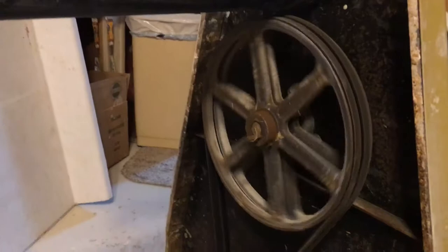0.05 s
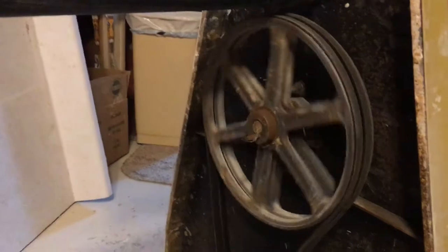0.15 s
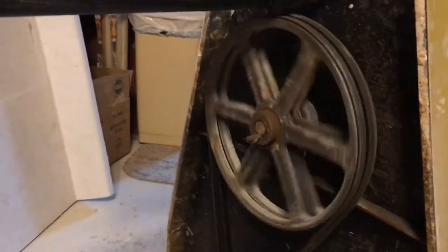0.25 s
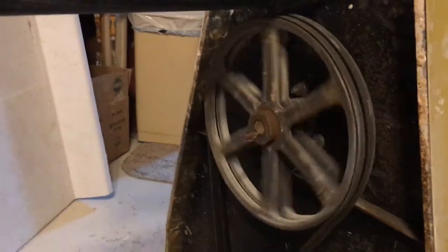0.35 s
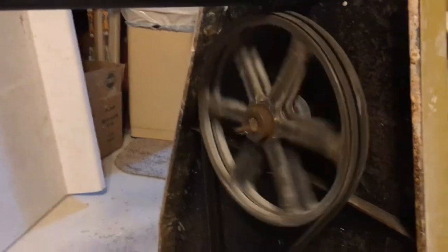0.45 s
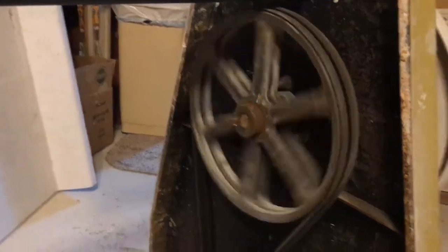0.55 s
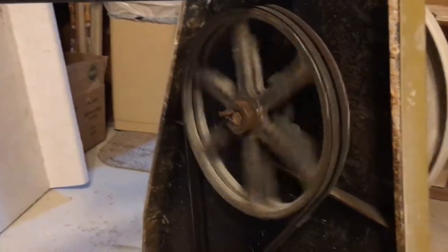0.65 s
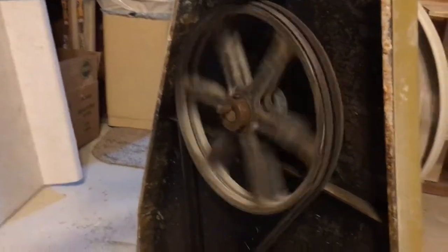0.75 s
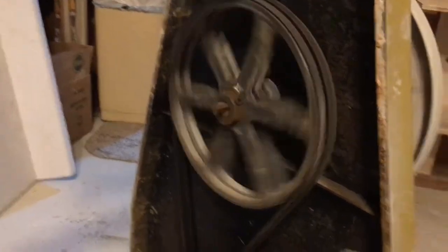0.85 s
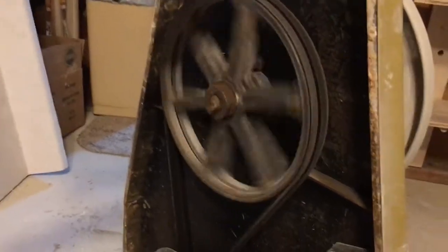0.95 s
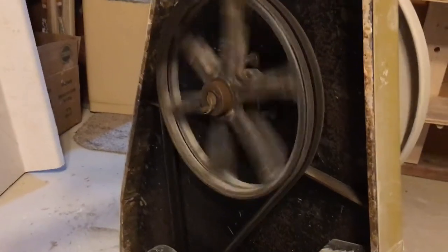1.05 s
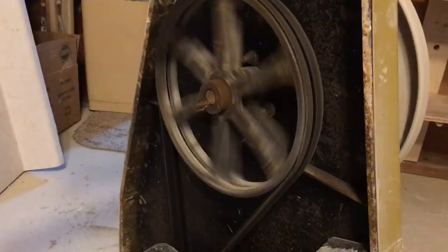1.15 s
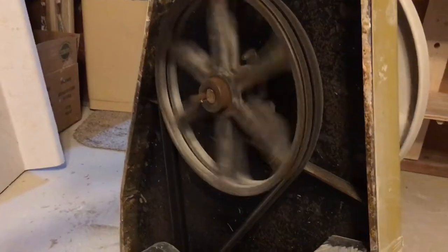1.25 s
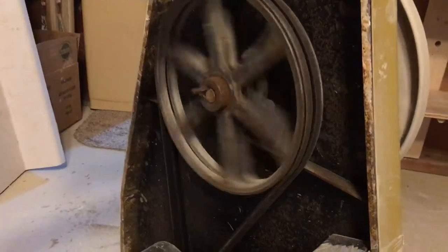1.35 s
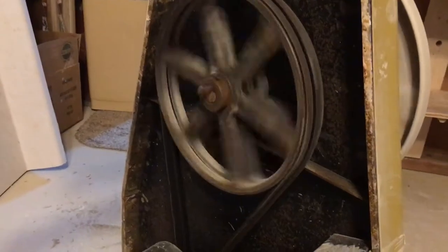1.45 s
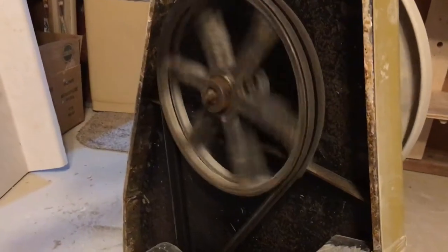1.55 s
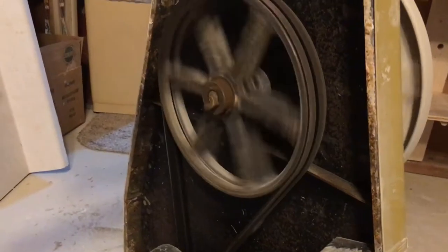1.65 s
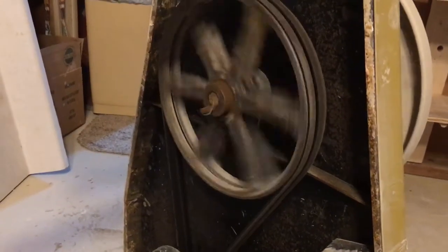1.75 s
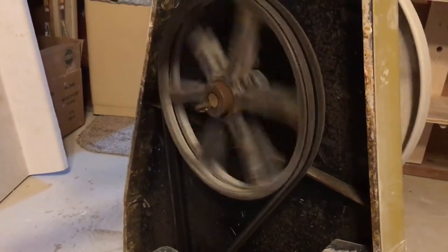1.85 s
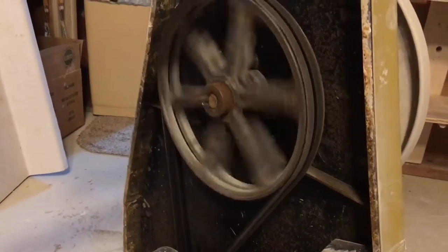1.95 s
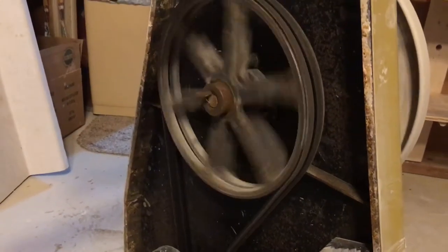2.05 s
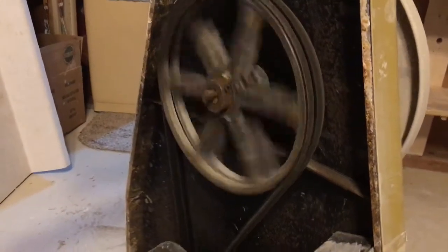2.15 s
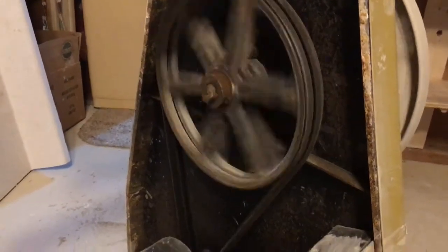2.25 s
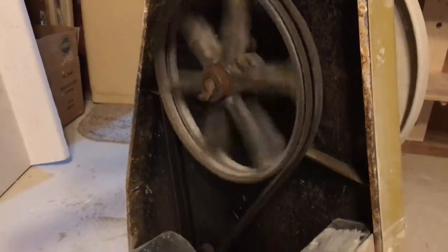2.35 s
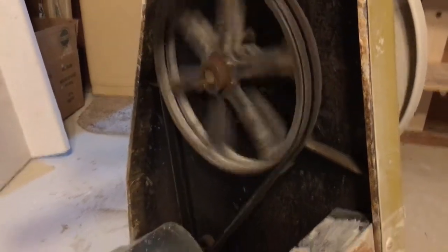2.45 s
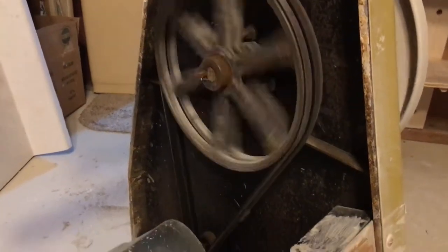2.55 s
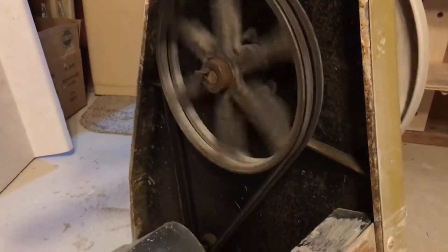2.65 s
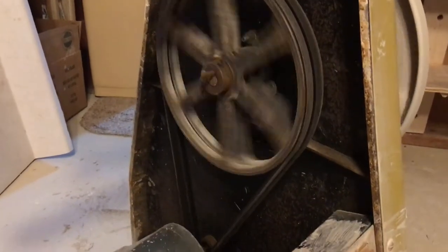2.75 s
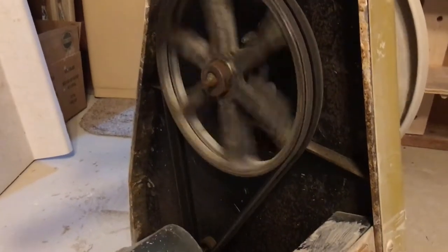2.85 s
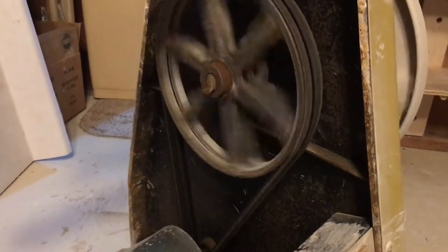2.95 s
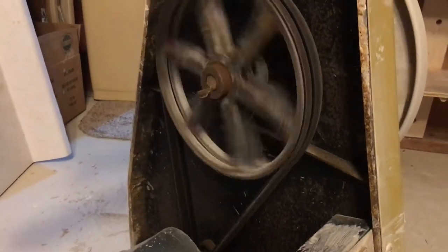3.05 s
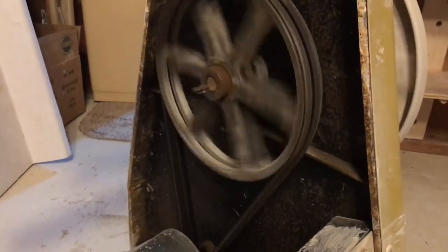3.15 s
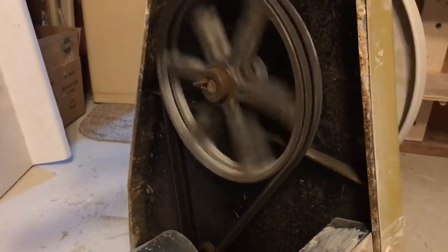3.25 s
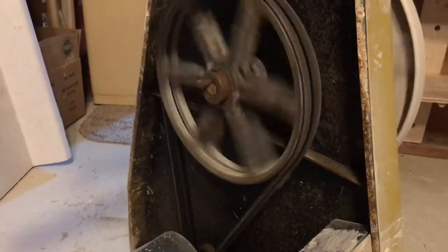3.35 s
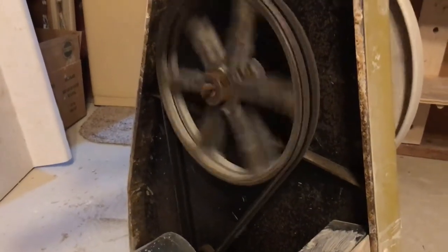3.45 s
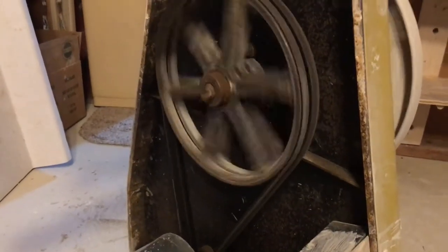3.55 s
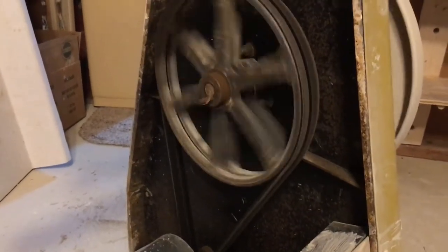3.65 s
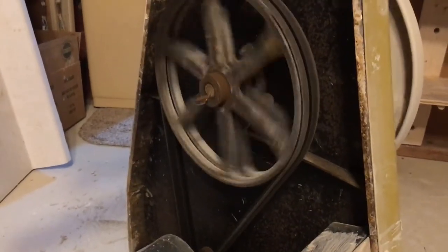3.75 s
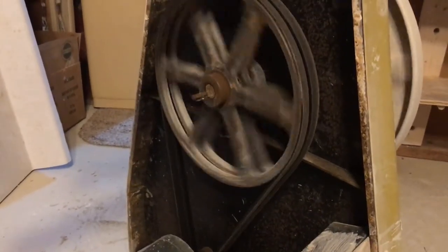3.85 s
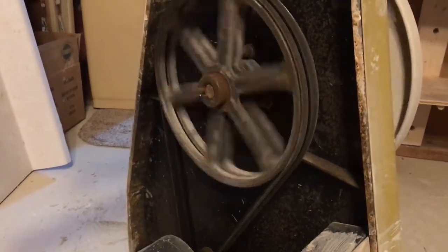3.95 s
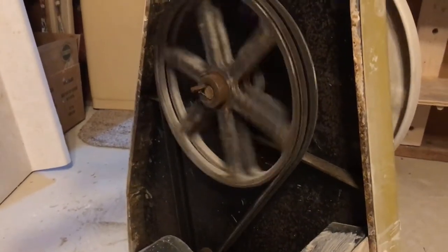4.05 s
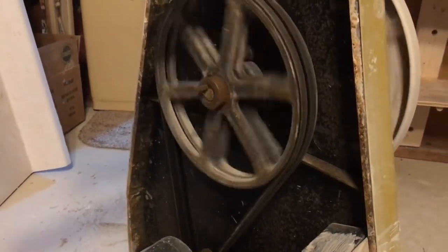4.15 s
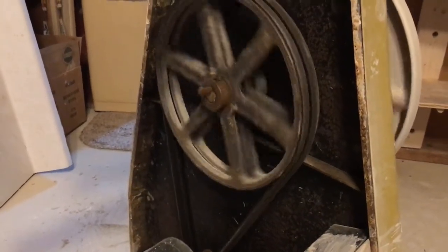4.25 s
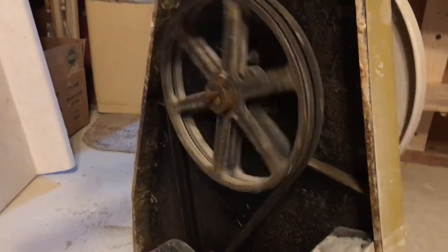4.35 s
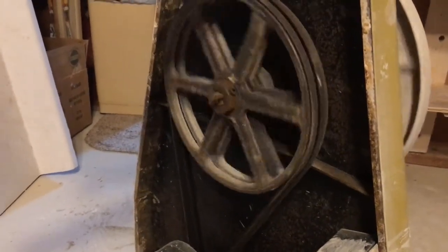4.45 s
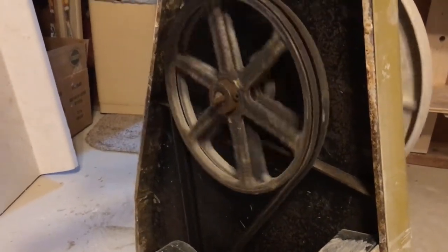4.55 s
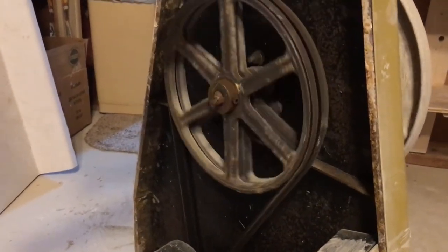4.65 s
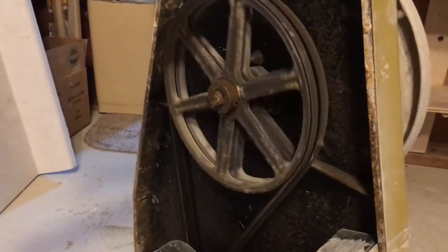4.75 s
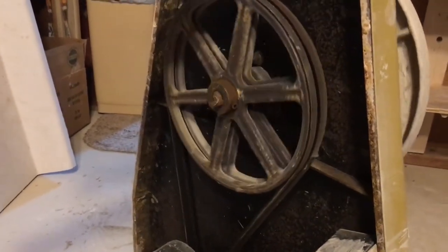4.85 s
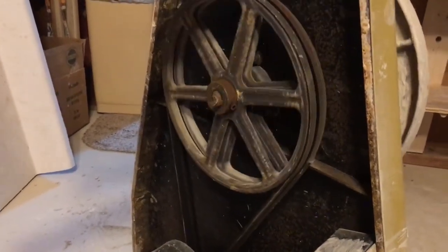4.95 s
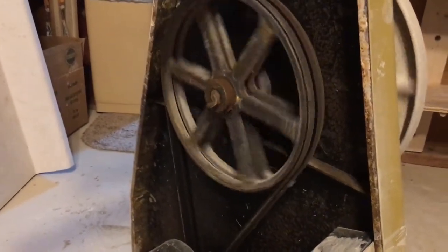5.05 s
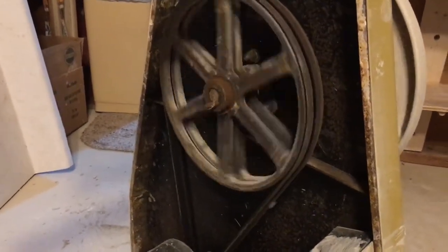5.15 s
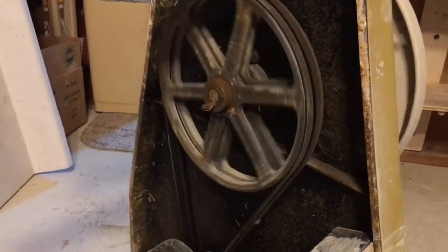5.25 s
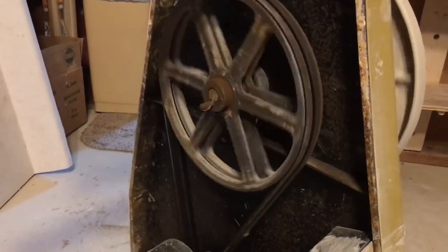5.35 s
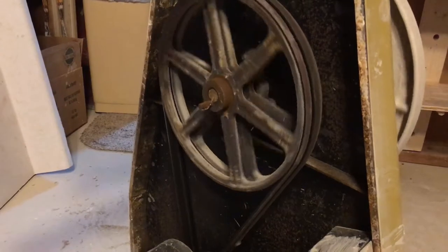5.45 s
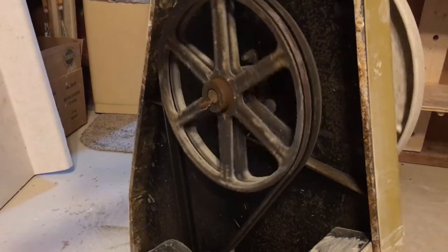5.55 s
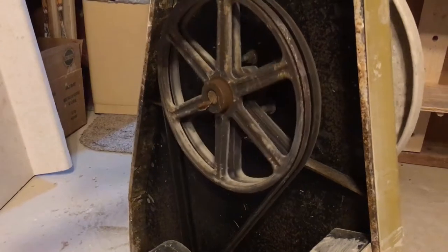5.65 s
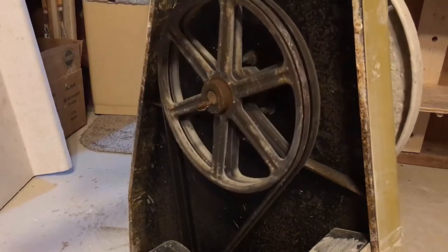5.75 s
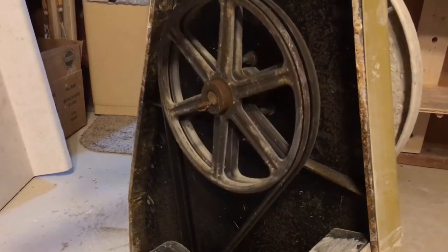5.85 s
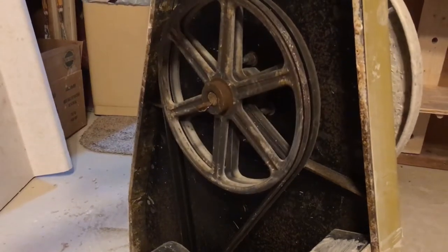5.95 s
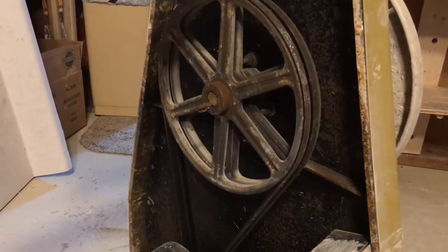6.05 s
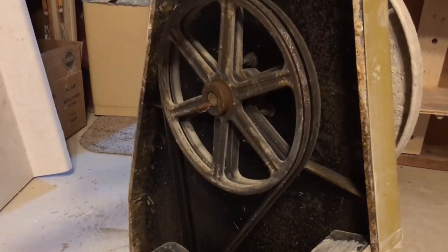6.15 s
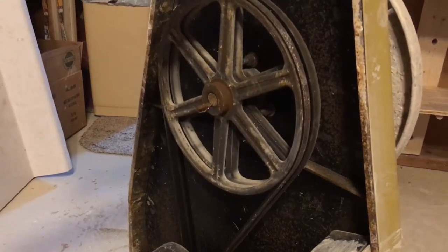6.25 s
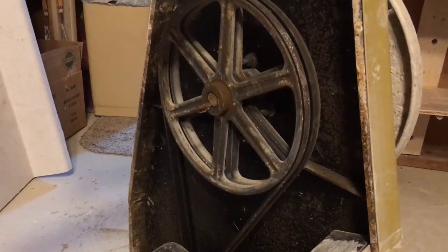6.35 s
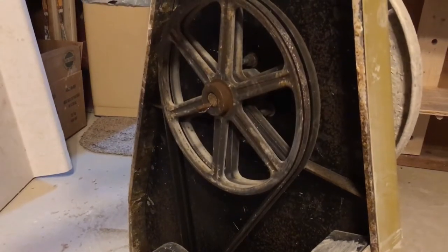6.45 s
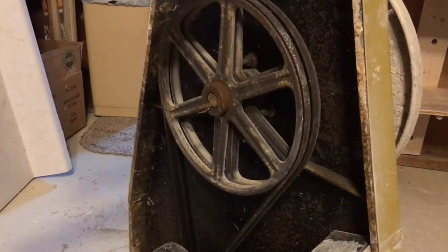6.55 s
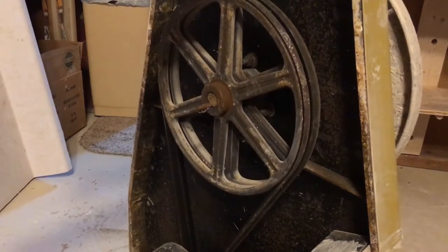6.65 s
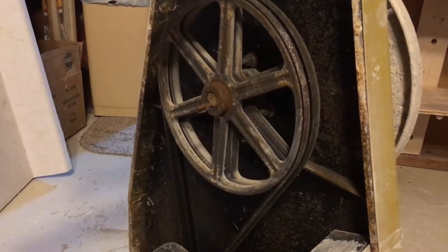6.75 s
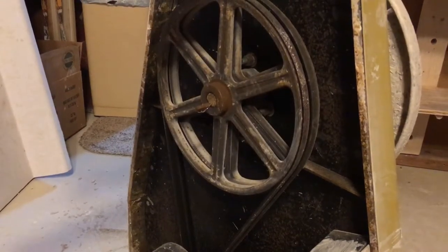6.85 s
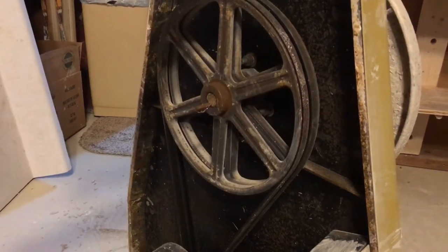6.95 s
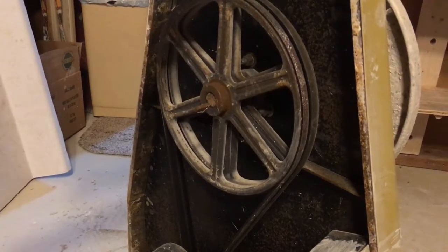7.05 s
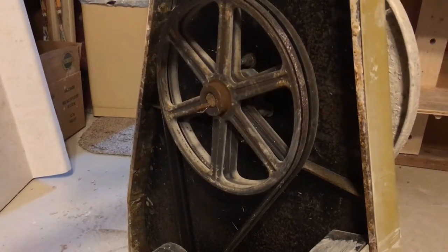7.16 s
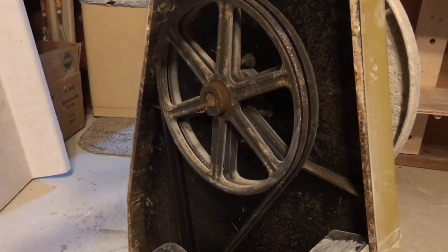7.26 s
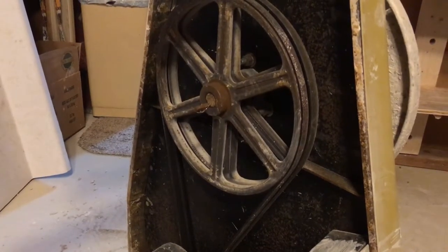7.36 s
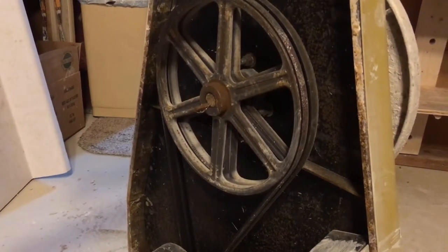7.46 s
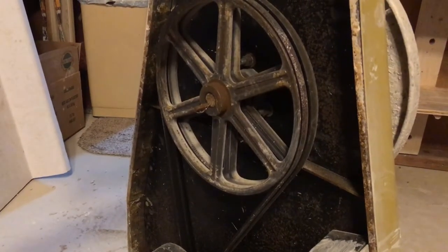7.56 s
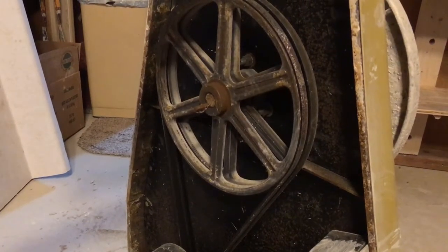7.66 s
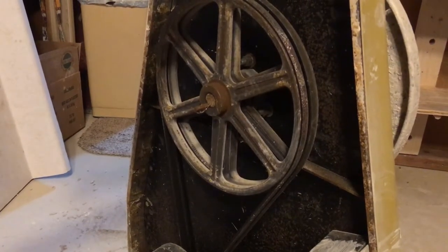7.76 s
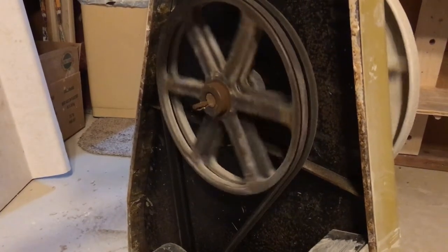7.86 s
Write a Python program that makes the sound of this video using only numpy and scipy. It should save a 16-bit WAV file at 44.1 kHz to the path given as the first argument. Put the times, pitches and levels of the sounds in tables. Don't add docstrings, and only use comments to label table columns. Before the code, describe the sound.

Close buzzing motor hum with whirring belt squeaks stops abruptly, the wheel whirs down, a metallic pedal clang rings, then quiet nudges and another bang.

```python
import sys
import numpy as np
from scipy import signal
from scipy.fft import rfft, irfft, next_fast_len
from scipy.io import wavfile

SR = 44100
rng = np.random.default_rng(int(sys.argv[2]) if len(sys.argv) > 2 else 0)


def store_wav(level_fs):
    pcm = np.round(np.clip(np.atleast_2d(level_fs), -1, 1) * 32767)
    wavfile.write(sys.argv[1], SR, pcm.T.astype(np.int16))


def boost(x):
    u = np.asarray(x, float) / 20
    return 10 ** u


N = 347949

# frequency in Hz, level in dB per Hz.
ROOM_SPECTRUM = [(30, -8), (50, -0.5), (75, 0), (100, -2), (140, -4), (180, -7), (260, -11.5), (300, -17.5),
                 (370, -15.5), (500, -25), (650, -29.5), (900, -39)]
ROOM_DB = -48
# frequency in Hz, level in dB.
APPLIANCES = [(41.1, -51.5), (120, -50.5), (138, -61), (222, -66), (258, -63)]
# frequency in Hz, level in dB per Hz.
AIR_SPECTRUM = [(410, -28), (700, -5), (757, -1), (1990, -9), (2860, -16.5), (3140, -15), (4890, -20.5),
                (12000, -23.5), (15800, -28)]
AIR_DB = -69
# centre in Hz, width in Hz, lift in dB.
PORT_DIP = (10500, 500, -7)

# start in seconds, peak in dB, brightness in dB.
NUDGES = [
    (5.75, -37, -9),
    (6.428, -52, -2),
    (6.758, -52, 0),
    (7.086, -44.5, -1),
    (7.254, -35.5, -3.5),
    (7.309, -51.5, 2),
    (7.555, -48, -0.5),
    (7.704, -38.5, -2),
]
# frequency in Hz, level in dB, T60 in seconds.
NUDGE_MODES = [(362.6, 2.5, 0.14), (410, -13, 0.17), (453, -17, 0.15), (587, -7.5, 0.16), (700, -17, 0.092),
               (870, -12, 0.054), (1770, -29, .05), (2600, -19, .008), (4500, -19.5, .006)]
# start in seconds, peak in dB, centre in Hz.
SCUFFS = [
    (7.084, -63, 2015),
    (7.252, -55, 2400),
    (7.702, -57.5, 2010),
]
SCUFF_S = 0.0055

# start in seconds, panel level in dB, low body level in dB, bright level in dB.
PEDAL_CONTACTS = [(5.052, -47, -43, -58), (5.0626, -12.5, -16.5, -17.5), (5.0664, -14.5, -15, -41),
                  (5.072, -9.5, -21, -40), (5.0793, -16, -15.5, -24), (5.0933, -20.5, -23.5, -31),
                  (5.1108, -33, -32, -41), (7.8342, -55, -34, -55), (7.8456, -30, -26, -32.5),
                  (7.855, -17.5, -14, -43), (7.8628, -29, -21, -36.5), (7.869, -35, -24, -43),
                  (7.879, -22, -32, -43)]
# band centre in Hz, level in dB, T60 in seconds.
CRASH_BANDS = [(130, -24, 0.48), (394, -18.5, 0.36), (900, -22.5, 0.076), (1700, -13, 0.18),
               (3300, -26, 0.22), (4870, -17, 0.21), (7990, -22, 0.2017), (6300, -11.5, 0.037),
               (12000, -15.5, .035), (12000, -38, .17)]
# level in dB, T60 in seconds.
BODY_HZ = [75, 114, 205, 242, 343, 402, 462, 430, 624, 786, 825, 870, 964]
BODY_RING = [(-21.5, 0.37), (-13, 0.33), (-20.5, 0.35), (-31, 0.44), (-12.5, 0.3), (-9, .3), (-13, 0.22),
             (-24, 0.17), (-29.5, 0.32), (-25, .2), (-15, .19), (-24, 0.22), (-29.5, 0.28)]
PANEL_HZ = [1200, 1310, 1514, 1545, 1580, 1754, 1927, 2060, 2119, 2223, 2703, 3009]
PANEL_RING = [(-19, .35), (-21, .1), (-2.5, .2), (-3, 0.2486), (3, 0.092), (-9, 0.25), (-24, .2),
              (-14.5, .12), (-13.5, .25), (-23, .2), (-13, .2), (-17.5, 0.21)]
BRIGHT_HZ = [1720, 3560, 3623, 3740, 3960, 4102, 4610, 4872, 5270, 5556, 5852, 6280, 8100]
BRIGHT_RING = [(6, .04), (-2.5, 0.14), (-6, 0.22), (-0.5, .05), (-2, .04), (-17, .18), (-16.5, 0.26),
               (-18, .16), (2.5, 0.016), (-5.5, .05), (-19.5, 0.17), (-15, .06), (-6.5, 0.061)]
BODY_RISE_S, PANEL_RISE_S, BRIGHT_RISE_S = 0.003, 0.0015, 0.0004
DAMP_S, DAMP_DB = 5.215, -3
CHATTER_DB, CHATTER_PER_S = 3.5, 40
# start in seconds, peak in dB, centre in Hz.
SCRAPES = [
    (5.04, -58, 1920),
    (5.048, -46, 5000),
    (5.052, -50, 8980),
    (7.833, -39, 5200),
    (7.834, -48, 10000),
    (7.842, -46, 9500),
    (7.846, -46, 6000),
    (7.85, -46, 10000),
]
SCRAPE_S = 0.007
# start in seconds, peak in dB, centre in Hz.
PIVOT_SQUEAKS = [
    (7.834, -38, 10150),
    (7.848, -42, 12900),
    (7.8525, -31, 11850),
    (7.8585, -37, 12000),
]

# start in seconds, peak in dB.
DRIVE_KNOCKS = [
    (0.585, -45),
    (0.625, -49),
    (0.661, -55),
    (2.0258, -40),
    (3.3191, -36),
]
# frequency in Hz, level in dB, T60 in seconds.
KNOCK_MODES = [(366, 12, .08), (1734, -3, 0.3), (2050, -5, 0.094), (2090, -9, 0.14)]
# start in seconds, peak in dB.
SLAPS = [(.294, -45), (.422, -41), (.559, -40), (.7, -40), (.981, -46), (1.379, -47), (1.481, -49),
         (1.554, -46), (1.798, -51), (2.825, -44.5), (2.995, -54), (3.69, -40), (3.73, -35.5), (3.96, -39),
         (4.003, -39), (4.03, -40), (4.082, -36), (4.11, -45), (4.141, -55), (4.19, -42), (4.235, -46),
         (4.379, -40.5), (4.41, -42.5), (4.644, -54)]
# frequency in Hz, level in dB, T60 in seconds.
SLAP_MODES = [(588, -9, 0.22), (621, -1, 0.23), (636, -7, 0.18)]
# start in seconds, peak in dB,
# centre in Hz.
LATE_CREAKS = [(1.6334, -38, 7560), (1.7047, -43, 6220), (4.9187, -60, 11300), (4.929, -57, 12000),
               (4.937, -57, 12500), (4.943, -58, 12000), (4.957, -57, 12000), (4.974, -57, 12000),
               (4.9482, -53, 11200), (4.9816, -55, 12000), (5.0055, -55, 12300), (5.037, -64, 12200),
               (5.2752, -58, 11500), (5.3994, -53, 8200), (5.4468, -55, 11600), (5.7443, -56.5, 9290)]
# start in seconds, peak in dB, centre in Hz.
SNAPS = [
    (5.7109, -54, 10070),
    (5.7967, -50.5, 12470),
    (5.8144, -53, 12600),
    (5.8184, -56, 11500),
    (5.8426, -44.5, 12000),
    (5.899, -60, 8270),
    (7.0834, -68, 7280),
    (7.2494, -46, 11240),
    (7.6994, -65, 9970),
]
CREAK_S, SNAP_S = 0.0024, 0.0012
# start in seconds, peak in dB, centre in Hz.
SWISHES = [(4.0, -47, 12500), (4.35, -53, 12500), (4.53, -52, 12400), (4.66, -57, 12800),
           (4.725, -58, 12300), (4.795, -57, 12300), (4.865, -60, 12300), (4.89, -60, 12300),
           (4.93, -63, 12900), (5.35, -50, 12300), (5.385, -51, 12300), (5.44, -54, 12160),
           (5.5, -57, 12600), (5.52, -58, 6550), (5.565, -61, 12500), (5.62, -63, 6550)]
SWISH_S = 0.013
# start in seconds, peak in dB, centre in Hz.
GUARD_RUBS = [(4.3, -59, 6500), (4.4, -61, 6500), (4.47, -59, 5940), (4.5, -55, 6550), (4.66, -60, 6500),
              (4.73, -63, 6500), (4.82, -61, 6550), (5.22, -62, 6500), (5.3, -59, 6300), (5.38, -58, 6550),
              (5.56, -60, 6480), (4.33, -56, 9500), (4.5, -57, 9400), (4.66, -58, 9500), (4.74, -60, 9500),
              (5.3, -58, 9600), (5.4, -58, 9600), (5.57, -57.5, 9700), (5.1, -59, 9700), (5.12, -60, 11600),
              (5.3, -60, 3200), (5.38, -60, 2500)]
# start in seconds, peak in dB, centre in Hz.
PANEL_SWELLS = [(.4, -51, 1540), (.72, -44, 1560), (.79, -41, 1540), (.84, -41, 1560), (.55, -41, 830),
                (.68, -37, 780), (0.68, -36, 785), (.97, -43, 850), (.82, -36, 615), (.88, -37, 570),
                (3.7, -41, 780), (3.8, -41, 770), (3.3, -44, 800), (3.3, -45, 760), (3.65, -43, 1390),
                (3.82, -47, 1230), (3.55, -41, 610), (3.62, -43, 600), (4.55, -57, 2300), (4.65, -59, 2250),
                (4.75, -59, 2300), (4.85, -60, 2250), (3.98, -46, 450)]
RUB_S = 0.04
# place in laps, peak in dB, centre in Hz.
WORN_SPOTS = [(.1, -34.5, 11300), (.19, -50, 12000), (.256, -34, 13000), (.295, -37, 12500),
              (.335, -35, 12500), (0.366, -38, 12000), (.392, -29.5, 12100), (0.416, -27.5, 12200),
              (.458, -50, 12500), (.508, -35, 11500), (.545, -33, 11600), (.59, -34, 12400),
              (.63, -48, 11500), (.68, -60.5, 11600), (.76, -57, 11600), (.795, -48, 11900),
              (.875, -44, 12000), (.965, -71, 11600)]
# creep in laps, grip in dB.
LAPS = [
    (0, -9),
    (-.012, -6),
    (-.008, -3),
    (-.008, -2),
    (-.008, -2),
    (0.001, -22.5),
]
SPOT_SPREAD_DB, SPOT_WANDER = 2.5, 0.0022
TURNS_PER_LAP, LAP_START = 25.68, -0.063
STIFF_AT, STIFF_WIDTH, STIFF_DB = 0.42, 0.31, 5.5
FLECK_DB, FLECK_SPREAD_DB, FLECK_S = -53, 6.5, 0.0033
FLECK_GLIDE, FLECK_ROUGH = 0.1, 0.5

# time in seconds, speed in turns per second.
ROTOR_SPEED = [(0, 9), (.4, 16.5), (.75, 23.95), (1.0, 26.6), (1.3, 27.9), (1.6, 28.12), (1.85, 28.35),
               (2.2, 28.5), (3.555, 28.5), (3.65, 26.3), (3.8, 23.6), (4.0, 19.9), (4.43, 11.9),
               (5.05, 1.5), (5.35, 6), (5.9, .5), (8, .5)]
TOP_SPEED = 28.5
SHOVE_S, SHOVE_HOLD_S = 5.1, 0.26
# full-speed level in dB, steepness, level after the jolt in dB, its fade in dB per s.
BELT_LAW = (-55.5, 0.99, -69, 28)
WHINE_LAW = (-56, 3, -95, 30)
RUMBLE_LAW = (-50, 1.5, -55.5, 46)
BOUNCE_LAW = (-54, 3.5, -67, 25)
BRUSH_LAW = (-60, 1.0, -75, 30)
DRUM_LAW = (-55.5, 2, -61, 59)
# turns per s, width, lift in dB.
CRITICAL = (15.5, 12, 15)
JUDDER = (22.5, 7, 6)
WHINE_LOCK = (28.5, 1.4, 7.5)
LOAD_DB, SHAKE_BELOW_DB = -44.5, -4.5
# frequency in Hz, level in dB per Hz.
RUMBLE_SPECTRUM = [(150, -12), (250, 0), (400, -6.5), (510, -14.5), (560, -3.5), (650, -2.5), (800, -4.5),
                   (950, -13.5), (1050, -28)]
SHIELD_SPECTRUM = [(560, -39.5), (950, -8.5), (1010, -10), (1200, -4.5), (1410, -5.5), (1530, 0.5),
                   (1850, -17), (2500, -15.5), (3250, -43.5), (5500, -120)]
BRUSH_SPECTRUM = [(1240, -44), (2100, -6), (2270, -15.5), (2510, -12.5), (2980, -2), (3530, -3),
                  (4120, -17), (4800, -20), (6240, -44.5), (10600, -120)]
BELT_SPECTRUM = [(2530, -26.5), (4300, -5.5), (5130, -2.5), (6530, -2.5), (7170, -6), (9540, -2),
                 (10500, -5.5), (11800, -4), (15300, -11), (16000, -18.5)]
# centre in Hz, width in Hz, lift in dB.
HOUSING = [(368, 54, 7.5), (452, 45, 11), (575, 17, 9.5), (617, 14, 12), (685.6, 14, 4), (775, 23, 7.5),
           (1208.5, 55, 10.5), (1362, 38, 7.5), (2292, 77, 6.5), (2700, 240, 2), (2936, 60, 9),
           (3056, 80, 6), (3300, 130, 5.5), (3510, 200, 7.5), (3900, 110, 8), (4310, 82, 7.5),
           (6550, 220, 3.5), (9620, 480, 4.5), (10520, 330, -8), (11600, 170, 6), (14760, 120, 8)]
# centre in Hz, width in Hz, lift in dB.
DRUM_PANEL = (617, 220, 11)
WHINE_HZ, WHINE_WIDTH_HZ = 1545, 60
SLOT_DB, COMMUTATOR_DB, PULLING_DB = -61.5, -62, -1.5
# centre in Hz, width in Hz, lift in dB.
TONE_PANELS = [(377, 24, 19), (355, 18, 16), (425, 40, 12), (635, 37, 7.5), (880, 30, 1), (790, 60, 5)]
BALLS_PER_TURN = 2.463
RACE_ORDERS = [52.67, 53.67, 54.67, 55.67, 56.14]
RACE_DB = [-82, -85, -84, -91, -86]
# centre in Hz, width in Hz, lift in dB.
RACE_PANEL = (1545, 150, 27)
BOUNCE_AT_S, BOUNCE_DB, BOUNCE_HZ, BOUNCE_SPREAD = 2.392, -41, 2930, 0.06

MAINS_HZ = 60
# multiple of mains, level in dB.
HUM_ORDERS = [(1, -19), (2, -33.5), (3, -11), (4, -16), (5, -15), (6, 1.5), (7, -15.5), (8, -16.5),
              (9, -24.5), (10, -48), (11, -24.5), (12, -62), (13, -24.5), (14, -26.5), (15, -30), (16, -69),
              (17, -41.5), (18, -37), (19, -34.5), (20, -33.5)]
# time in seconds, hum in dB, extra level of the lowest orders under load in dB.
CURRENT = [
    (0.0, -34.5, -17.5),
    (0.31, -35, -13),
    (0.39, -37, -8),
    (0.48, -33.5, -11.5),
    (0.59, -32, -11),
    (1.03, -32, -17),
    (1.33, -32.5, -16.5),
    (3.459, -32.5, -17),
    (3.54, -34.5, -16.5),
]
POWER_OFF_S, HUM_T60_S = 3.555, 0.085
LOW_CUT_HZ, TOP_CUT_HZ, CEILING = 36, 16250, 1.3


def rms_one(x):
    return x / np.sqrt(np.mean(x ** 2) + 1e-20)


def in_time(rows, off_db=-110):
    s, *columns = np.transpose(rows)
    return [np.interp(np.arange(N) / SR, s, c, right=off_db) for c in columns]


def drift(rate):
    r = np.exp(-80 * np.pi * rate / SR)
    slow = signal.lfilter([1], [1, -2 * r, r * r], rng.standard_normal(N // 40 + 2002))[2000:]
    return np.interp(np.arange(N) / 40, np.arange(len(slow)), rms_one(slow))


def bump(x, centre, width, peak_db):
    return peak_db / (1 + ((x - centre) / width * 2) ** 2)


def coloured(source, spectrum, peaks=()):
    size = next_fast_len(N)
    hz = np.arange(size // 2 + 1) * SR / size + 1
    points_hz, points_db = np.array(spectrum).T
    db = np.interp(np.log(hz), np.log(points_hz), points_db, left=-90, right=-90)
    for peak in peaks:
        db = db + bump(hz, *peak)
    return rms_one(irfft(rfft(source, size) * boost(db), size)[:N])


def gritty(rate, depth_db):
    return rng.standard_normal(N) * boost(depth_db * drift(rate))


def band_noise(noise, low_hz, high_hz):
    edges = [low_hz, min(high_hz, 17000)]
    return rms_one(signal.sosfilt(signal.butter(2, edges, "band", fs=SR, output="sos"), noise))


def rings(times, levels_db, modes, spread_db, rise_s):
    first = int(min(times) * SR)
    at = (np.array(times) * SR).astype(int) - first
    luck = rng.standard_normal((len(at), 2, len(modes)))
    out = []
    for k, (hz, mode_db, t60) in enumerate(modes):
        clicks = np.full(N - first, 1e-18)
        clicks[at] = boost(levels_db + mode_db + spread_db * luck[:, 0, k]) * np.sign(luck[:, 1, k])
        w = 2 * np.pi * hz / SR
        r = boost(-60 / (np.clip(t60, 0.004, 0.6) * SR))
        q = np.exp(-1 / (rise_s * SR))
        g = (1 - q * q) / 2
        ring = [0, np.sin(w), 0, 1, -2 * r * np.cos(w), r * r]
        rise = [g, 0, -g, 1, -2 * q * np.cos(w), q * q]
        out.append(signal.sosfilt([ring, rise], clicks))
    return out


def strike(times, levels_db, modes, spread_db, rise_s=0.0004):
    ring = sum(rings(times, levels_db, modes, spread_db, rise_s))
    return np.pad(ring, (N - len(ring), 0))


def creaks(table, length_s, width):
    out, size = np.zeros(N), 3072
    t = np.arange(size) / SR
    shape = t / length_s * np.exp(1 - 1.4 * t / length_s) * 3.0
    for (s, peak_db, hz), noise in zip(table, rng.standard_normal((len(table), size))):
        burst = boost(peak_db - 16.5) * band_noise(noise, hz / (1 + width), hz * (1 + width)) * shape
        add_to = out[int(s * SR):int(s * SR) + size]
        add_to += burst[:len(add_to)]
    return out


def squeaks(table, length_s):
    out, t = np.zeros(N + 1024), np.arange(1024) / SR
    luck = rng.standard_normal((len(table), 2))
    wobbles = rng.standard_normal((len(table), 16))
    for (s, peak_db, hz), (glide, stretch), wobble in zip(table, luck, wobbles):
        u = t / (length_s * np.exp(0.35 * stretch))
        pitch = hz * (1 + FLECK_GLIDE * (glide - 0.5) * (u - 1))
        phase = 2 * np.pi * np.cumsum(pitch) / SR + FLECK_ROUGH * np.interp(t, t[::64], wobble)
        out[int(s * SR):][:len(t)] += boost(peak_db - 8.5) * u * np.exp(1 - u * u) * np.sin(phase)
    return out[:N]


def rotor():
    speed, = in_time(ROTOR_SPEED)
    turns = np.cumsum(speed) / SR
    return speed, turns, LAP_START + turns / TURNS_PER_LAP


def workshop():
    t = np.arange(N) / SR
    tones = sum(boost(db + 1.2 * drift(2.1)) * np.sin(2 * np.pi * hz * t) for hz, db in APPLIANCES)
    hiss = boost(AIR_DB) * coloured(rng.standard_normal(N), AIR_SPECTRUM, [PORT_DIP])
    return boost(ROOM_DB) * coloured(gritty(6.2, 1.0), ROOM_SPECTRUM) + hiss + np.sqrt(2) * tones


def foot_nudges():
    s, peak_db, bright_db = np.transpose(NUDGES)
    body = strike(s, peak_db - 2.5, NUDGE_MODES[:3], 2.2)
    bright = strike(s, peak_db + bright_db - 3.5, NUDGE_MODES[3:], 0.96)
    return body + bright + creaks(SCUFFS, SCUFF_S, width=0.96)


def pedal_bangs():
    s, panel_db, body_db, bright_db = np.transpose(PEDAL_CONTACTS)
    rows = rings(s, panel_db - 5.0, np.c_[PANEL_HZ, PANEL_RING], 1.2, PANEL_RISE_S)
    t = s[0] + np.arange(len(rows[0])) / SR
    damped = boost(DAMP_DB * np.clip((t - DAMP_S) * 50, 0, 1) * (t < 7))
    body = rings(s, body_db + 4.5, np.c_[BODY_HZ, BODY_RING], 2.2, BODY_RISE_S)
    rows += [damped * row for row in body]
    rows += rings(s, bright_db - 3.0, np.c_[BRIGHT_HZ, BRIGHT_RING], 1.9, BRIGHT_RISE_S)
    chatter = boost(CHATTER_DB * (drift(CHATTER_PER_S) - 0.3))
    ringing = sum(row * chatter[5000 * k:][:len(t)] for k, row in enumerate(rows))
    out = np.pad(ringing, (N - len(t), 0))
    first = int(s[0] * SR) - 2000
    for hz, band_db, t60 in CRASH_BANDS:
        hit_db = body_db if hz < 1000 else panel_db if hz < 2500 else bright_db
        power = np.full(N - first, 1e-18)
        power[(s * SR).astype(int) - first] = boost(hit_db) ** 2
        swell = np.exp(-hz / (2.5 * SR))
        decay = boost(-120 / (t60 * SR))
        power = signal.sosfilt([1 - swell, 0, 0, *np.convolve([1, -swell], [1, -decay])], power)
        band = band_noise(rng.standard_normal(N - first), hz / 1.42, hz * 1.42)
        out[first:] += boost(band_db) * band * np.sqrt(np.abs(power))
    return out + creaks(SCRAPES, SCRAPE_S, width=0.6)


def belt_knocks():
    out = strike(*np.transpose(SLAPS), SLAP_MODES, 3.1, rise_s=0.0032)
    s, peak_db = np.transpose(DRIVE_KNOCKS)
    out += creaks([(a, db + 0.5, 1850) for a, db in DRIVE_KNOCKS], 0.0074, width=0.14)
    out += strike(s, peak_db - 13.0, KNOCK_MODES, 1.4)
    return out + strike(s + 0.012, peak_db - 7.0, KNOCK_MODES, 1.7)


def slowing_belt():
    out = creaks(SNAPS, SNAP_S, width=0.55) + creaks(LATE_CREAKS + PIVOT_SQUEAKS, CREAK_S, width=0.085)
    out += creaks(GUARD_RUBS[:11], RUB_S / 2, width=0.035)
    out += creaks(GUARD_RUBS[11:], RUB_S / 2, width=0.05)
    return out + creaks(SWISHES, SWISH_S, width=0.13)


def worn_spots():
    lap = rotor()[2]
    luck = rng.standard_normal((len(LAPS), len(WORN_SPOTS), 3))
    rows = []
    for k, (creep, grip_db) in enumerate(LAPS):
        for (place, db, hz), (a, b, c) in zip(WORN_SPOTS, luck[k]):
            at = k - 1 + place + creep + SPOT_WANDER * a
            if lap[0] < at < 4.28:
                level_db = db + grip_db + SPOT_SPREAD_DB * b
                rows.append((np.searchsorted(lap, at) / SR, level_db, hz * (1 + 0.025 * c)))
    return rows


def flecks(count):
    lap = rotor()[2]
    which, pitch = rng.random((2, count))
    place, strength = rng.standard_normal((2, count))
    k = (which * 5).astype(int)
    at = np.abs(k + STIFF_AT + 0.15 * place)
    db = FLECK_DB + np.array(LAPS)[k + 1, 1] + FLECK_SPREAD_DB * strength
    rows = zip(np.searchsorted(lap, at) / SR, db, 5500 * 2.7 ** np.sqrt(pitch))
    return [row for row, lap_at in zip(rows, at) if lap_at < 4.41]


def belt_creaks():
    spots = worn_spots()
    out = boost(-3.0) * creaks(spots, CREAK_S, width=0.1) + boost(-7.0) * squeaks(spots, 0.0033)
    return out + squeaks(flecks(count=360), FLECK_S)


def brush_bounces():
    speed, turns, _ = rotor()
    landings = np.arange(5, 104) + turns[int(BOUNCE_AT_S * SR)] % 1
    luck = rng.standard_normal((len(landings), 3))
    at = np.searchsorted(turns, landings + 0.07 * luck[:, 0])
    db = BOUNCE_DB + 2.3 * luck[:, 1] + 25 * np.log10(speed[at] / TOP_SPEED)
    rows = list(zip(at / SR, db, BOUNCE_HZ * (1 + BOUNCE_SPREAD * np.abs(luck[:, 2]))))
    return creaks(rows, 0.0052, width=0.034)


def race():
    speed, turns, _ = rotor()
    wobble = 0.6 * drift(3)
    out = 0
    for k, (order, db) in enumerate(zip(RACE_ORDERS, RACE_DB)):
        gain_db = db + bump(order * speed, *RACE_PANEL) + 2 * drift(4)
        phase = 2 * np.pi * order * turns + wobble + 0.4 * drift(6) + k * k
        out = out + np.sqrt(2) * boost(gain_db) * np.sin(phase)
    return speed / TOP_SPEED * out


def bearing(turns, speed, slip, load_db, spread_s):
    passes = np.floor(BALLS_PER_TURN * turns + slip * drift(27))
    clicks = np.diff(np.maximum.accumulate(passes), prepend=0) * np.sqrt(np.maximum(speed, 0))
    clicks = clicks * boost(load_db * np.cos(2 * np.pi * turns) + 2.8 * rng.standard_normal(N))
    t = np.arange(2048) / SR
    casting = rng.standard_normal(len(t)) * np.exp(-t / spread_s) * (1 - np.exp(-t / 0.0027))
    return rms_one(signal.fftconvolve(clicks, casting)[:N])


def rubbing(slow_db, top_db, steep, shove_db, fade):
    t = np.arange(N) / SR - SHOVE_S
    jolt = (t > 0) * boost(shove_db - fade * np.maximum(t - SHOVE_HOLD_S, 0))
    return np.hypot(boost(top_db + steep * slow_db), jolt)


def turning():
    speed, turns, lap = rotor()
    powered = np.clip(1 - (np.arange(N) / SR - POWER_OFF_S) / HUM_T60_S, 0, 1)
    slow_db = 20 * np.log10(speed / TOP_SPEED)
    moving = np.clip(speed - 0.5, 0.003, 1)
    judder_db = bump(speed, *JUDDER)
    shake = rubbing(np.minimum(slow_db - SHAKE_BELOW_DB, 0), *RUMBLE_LAW)
    shake = moving * np.hypot(shake, boost(LOAD_DB) * powered * (1 - speed / TOP_SPEED))
    boom = moving * rubbing(slow_db, *DRUM_LAW) * boost(bump(speed, *CRITICAL))
    rub = moving * np.hypot(rubbing(slow_db, *BOUNCE_LAW), rubbing(slow_db, *BRUSH_LAW))
    stiff_db = bump(lap % 1, STIFF_AT, STIFF_WIDTH, STIFF_DB)
    drag = moving * rubbing(slow_db + stiff_db, *BELT_LAW)
    sing_db = bump(speed, *WHINE_LOCK) + powered * judder_db + 0.7 * drift(4)
    sing = moving * rubbing(slow_db, *WHINE_LAW) * boost(sing_db)
    shield_gain = shake ** 0.45 * rub ** 0.6 * boost((0.84 + 0.44 * powered) * judder_db)
    clicks = bearing(turns, speed, slip=0.012, load_db=4.5, spread_s=0.010)
    throb = boost(3 * np.cos(2 * np.pi * (turns + 0.1)))
    rumble = coloured(gritty(25, 1.1) + 0.4 * clicks, RUMBLE_SPECTRUM, HOUSING)
    shield = coloured(gritty(80, 1.5) + 0.12 * clicks, SHIELD_SPECTRUM, HOUSING)
    drum = coloured(gritty(14, 1.5) + 0.3 * clicks, RUMBLE_SPECTRUM, [DRUM_PANEL])
    brush = coloured(throb * gritty(120, 1.8) + 0.7 * clicks, BRUSH_SPECTRUM, HOUSING)
    belt = coloured(gritty(60, 1.3) * boost(2 * drift(300)), BELT_SPECTRUM, HOUSING)
    whine_peak = (WHINE_HZ, WHINE_WIDTH_HZ, 30)
    whine = coloured(rng.standard_normal(N), [(1300, -18.5), (1800, -25.5)], [whine_peak])
    out = boost(0.36) * shake * rumble + boost(-0.6) * shield_gain * shield + boom * drum
    out += rub * brush + drag * belt + boost(-15) * sing * whine
    for order, tone_db in ((16, SLOT_DB), (32, COMMUTATOR_DB)):
        panels_db = sum(bump(order * speed, *panel) for panel in TONE_PANELS)
        gain_db = tone_db + slow_db + PULLING_DB * powered + panels_db
        phase = 2 * np.pi * order * turns + 0.19 * drift(25)
        out += np.sqrt(2) * boost(gain_db + 0.7 * drift(20)) * np.sin(phase)
    return out + creaks(PANEL_SWELLS, RUB_S / 2, width=0.025)


def hum():
    t = np.arange(N) / SR
    level_db, load_db = in_time(CURRENT + [(4, *CURRENT[-1][1:])])
    level_db = level_db - 60 * np.maximum(t - POWER_OFF_S, 0) / HUM_T60_S
    out = 0
    for k, order_db in HUM_ORDERS:
        gain_db = order_db + (load_db + 15.0) * (k <= 4)
        gain_db = gain_db + (load_db + 16.0) * 0.73 * (k in (5, 7, 8, 11, 13, 14))
        gain_db = gain_db + (0.23 + 0.11 * abs(order_db)) * drift(4.0)
        phase = k * MAINS_HZ * t + 0.173 * (k - 2) ** 2
        out = out + boost(gain_db) * np.sin(2 * np.pi * phase)
    return np.sqrt(2) * boost(level_db) * out


def scene():
    out = workshop() + foot_nudges() + pedal_bangs()
    out += belt_knocks() + slowing_belt() + belt_creaks()
    out += brush_bounces() + race() + turning() + hum()
    return out[None]


def roll_off(x):
    return signal.sosfilt(signal.butter(12, 16620, fs=SR, output="sos"), x)


def record(dry):
    dry = signal.sosfilt(signal.butter(4, LOW_CUT_HZ, "high", fs=SR, output="sos"), dry)
    dry = CEILING * np.tanh(dry / CEILING)
    dry = signal.sosfilt(signal.cheby2(12, 50, TOP_CUT_HZ, fs=SR, output="sos"), dry)
    return roll_off(dry)


dry = scene()
out = record(dry)
store_wav(out)
```